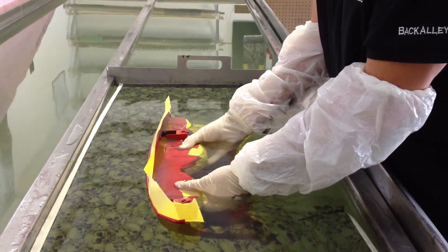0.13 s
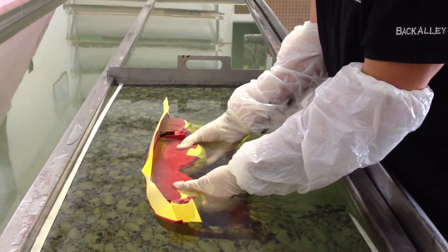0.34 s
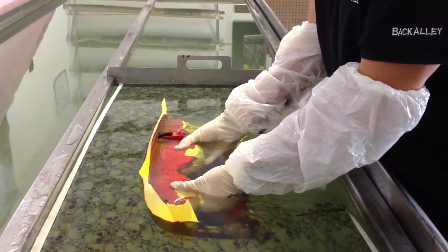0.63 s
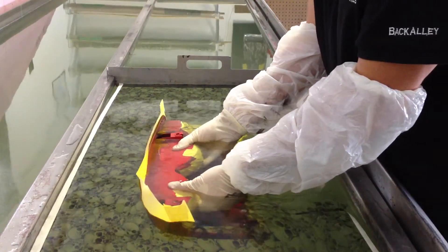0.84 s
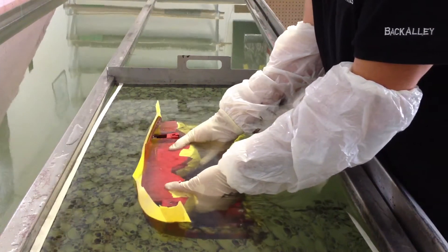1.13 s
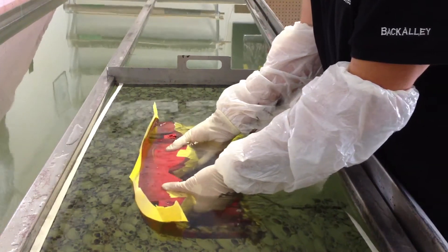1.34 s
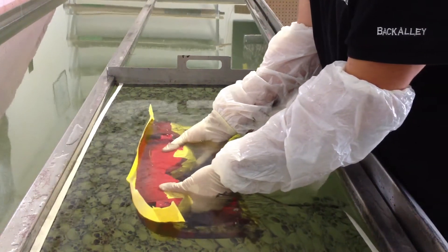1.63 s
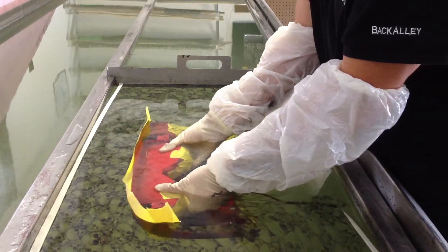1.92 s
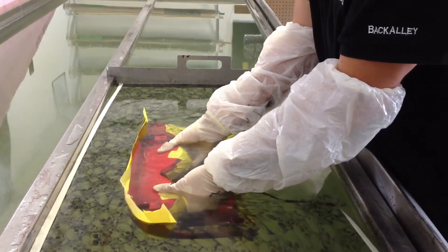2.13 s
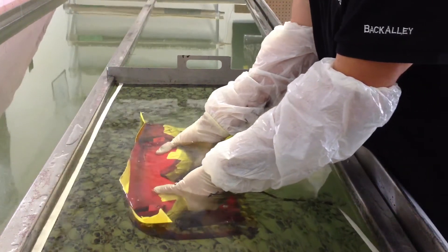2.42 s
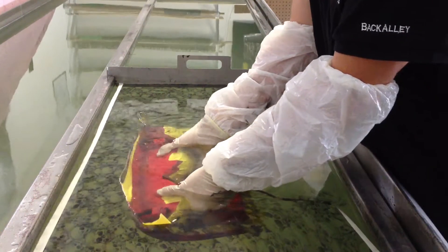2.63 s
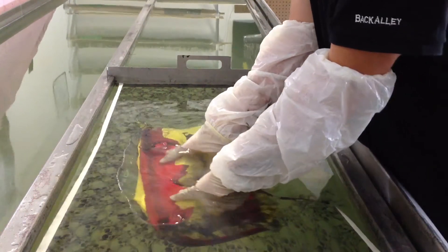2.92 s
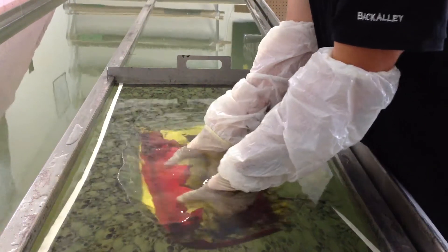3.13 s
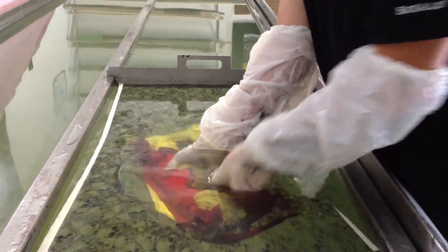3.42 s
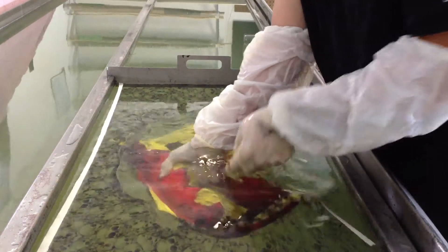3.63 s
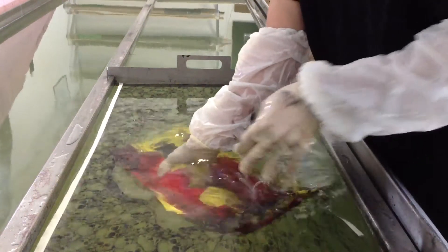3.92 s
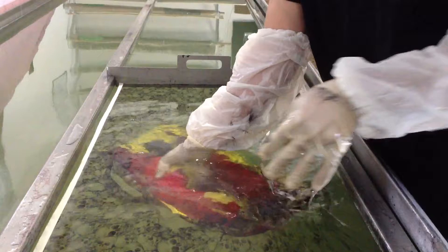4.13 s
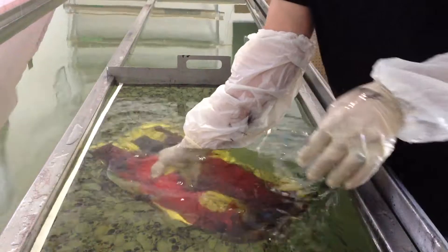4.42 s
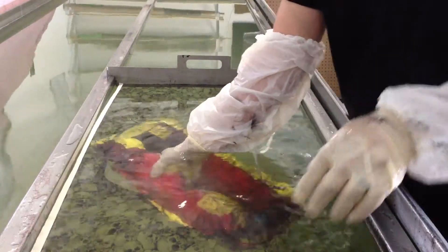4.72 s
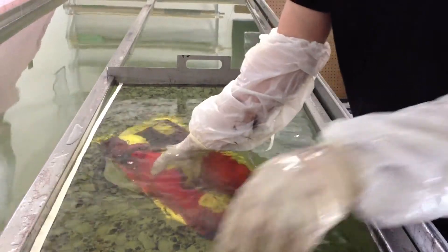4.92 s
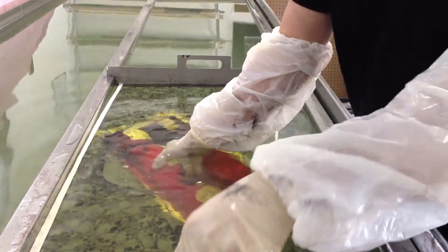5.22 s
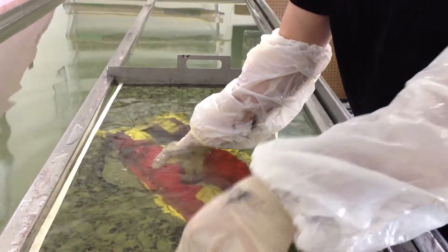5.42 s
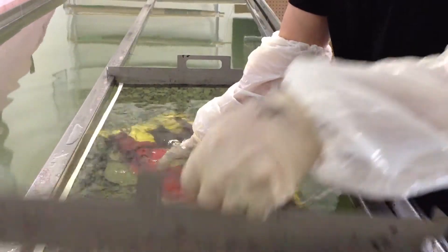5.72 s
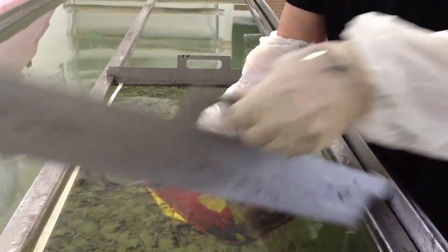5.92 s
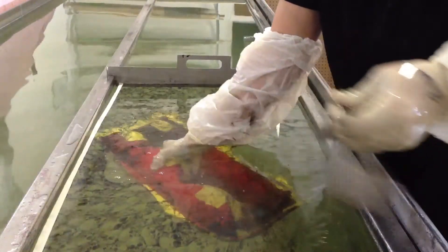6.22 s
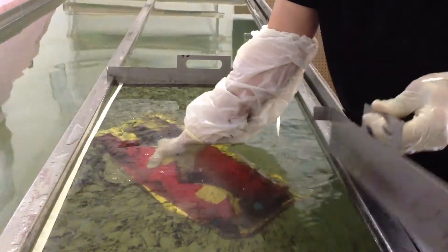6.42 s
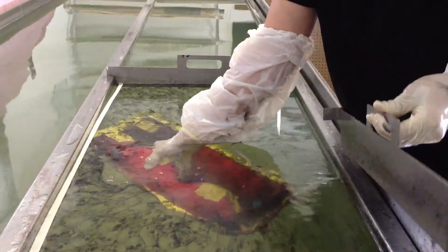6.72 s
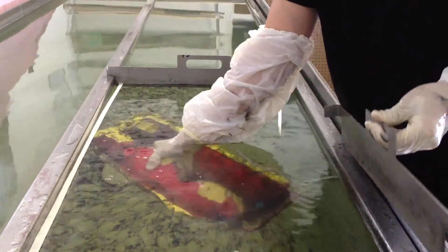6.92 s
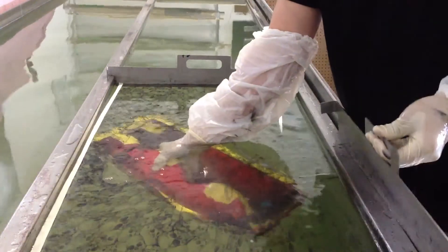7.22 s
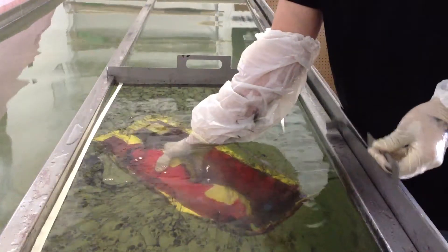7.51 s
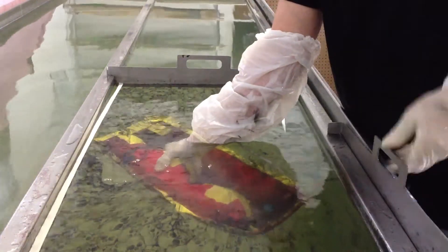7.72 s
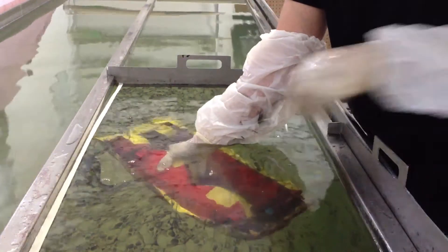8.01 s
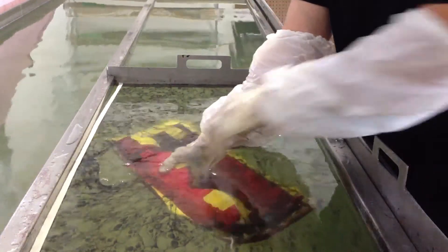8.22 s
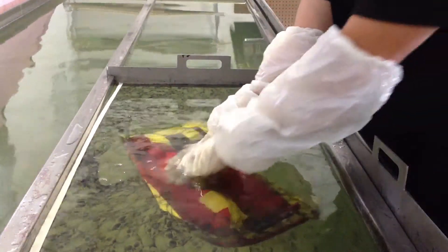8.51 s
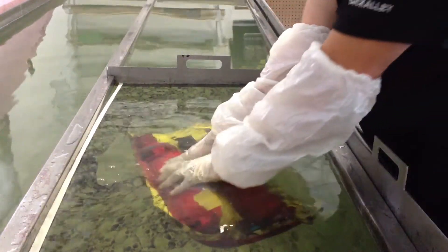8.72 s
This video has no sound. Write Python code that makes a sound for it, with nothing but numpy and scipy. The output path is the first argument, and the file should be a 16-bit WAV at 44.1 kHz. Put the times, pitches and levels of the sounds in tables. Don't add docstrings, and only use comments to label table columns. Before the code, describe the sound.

Quiet shed hum with cricket and bird, then wet plastic sleeves crackle, drops plink, and a steel bar clangs and scrapes on a tank rim.

```python
import sys
import numpy as np
from scipy import signal
from scipy.fft import rfft, irfft
from scipy.io import wavfile
from scipy.ndimage import map_coordinates

SR = 44100
rng = np.random.default_rng(int(sys.argv[2]) if len(sys.argv) > 2 else 0)


def gain_from_db(level_db):
    decades = np.asarray(level_db, float) / 20
    return 10 ** decades


def log_audio(samples):
    frames = np.atleast_2d(samples).T
    limited = np.clip(frames, -1, 1)
    pcm = np.round(limited * 32767).astype(np.int16)
    wavfile.write(sys.argv[1], SR, pcm)


N = 390726


def rms_one(x):
    return x / np.sqrt(np.mean(x ** 2) + 1e-20)


def energy_one(x):
    return x / np.sqrt(np.sum(x ** 2))


def seconds(length_s):
    return np.arange(round(length_s * SR)) / SR


def bin_hz(length):
    return np.maximum(np.fft.rfftfreq(length, 1 / SR), 10)


def high_pass(order, hz):
    return signal.butter(order, hz, "high", fs=SR, output="sos")


def in_time(rows, outside=None):
    s, *columns = np.transpose(rows)
    return [np.interp(np.arange(N) / SR, s, c, outside, outside) for c in columns]


def at_hz(points, hz):
    table = np.array(points)
    return np.interp(np.log(hz), np.log(table[:, 0]), table[:, 1])


def drift(rate):
    r = np.exp(-80 * np.pi * rate / SR)
    white = rng.standard_normal(N // 40 + 2002)
    slow = rms_one(signal.lfilter([1], [1, -2 * r, r * r], white)[2000:])
    return np.interp(np.arange(N) / 40, np.arange(len(slow)), slow)


def colour(x, spectrum):
    return rms_one(irfft(rfft(x) * gain_from_db(at_hz(spectrum, bin_hz(len(x)))), len(x)))


def add(out, s, sound):
    i = round(s * SR)
    out[i:i + len(sound)] += sound[:N - i]


def grains(per_s, spread_db):
    sizes = gain_from_db(spread_db * np.minimum(rng.exponential(1, N), 5)) * rng.choice([-1, 1], N)
    return rms_one(sizes * (rng.random(N) < per_s / SR))


def modes(table, length_s):
    t, out = seconds(length_s), 0
    for hz, db, t60 in table:
        out = out + gain_from_db(db - 60 * t / t60) * np.sin(2 * np.pi * hz * t) * rng.choice([-1, 1])
    return energy_one(out)


def dying_noise(spectrum, t60_at, rise_cycles, late_db, length_s):
    t, out = seconds(length_s), 0
    edges = 45 * 2 ** np.arange(1, 8.9, 1 / 3)
    white = rng.standard_normal((2, len(t)))
    for k, (low, high) in enumerate(zip(edges, edges[1:])):
        hz = np.sqrt(low * high)
        t60 = at_hz(t60_at, hz)
        fall_db = -60 * t / t60
        rise = 1 - np.exp(-t * hz / rise_cycles)
        shape = rise * (gain_from_db(fall_db) + gain_from_db(late_db + 0.41 * fall_db)) / np.sqrt(t60)
        third = signal.butter(2, [low, high], "band", fs=SR, output="sos")
        out = out + gain_from_db(at_hz(spectrum, hz)) * shape * signal.sosfilt(third, white[k % 2])
    return energy_one(out)


def excite(force, response, first_s):
    i = round(first_s * SR)
    return np.r_[np.zeros(i), signal.fftconvolve(force[i:], response)[:N - i]]


def shed_air():
    # f/Hz, density level/dB
    spectrum = [(24, -68), (40, -38.5), (91, -14.5), (132, -7.5), (218, -6.5), (333, -8), (417, -5.5),
                (562, -10.5), (1160, -13), (1640, -17.5), (6160, -19), (8110, -11.5), (9410, -26.5),
                (14400, -19), (15500, -18.5)]
    # t/s, level/dB
    swell = [(0, -1), (1, 0), (2, 0.5), (3, 0), (4, 1), (5, 3.5), (6.5, 2), (8.86, 0)]
    level_db = -65.5 + in_time(swell)[0] + .6 * drift(3.0)
    return gain_from_db(level_db) * colour(rng.standard_normal(N), spectrum)


def motor():
    # t/s, rate/(turns per s)
    speed = [(0, 24.0), (.33, 23.9), (.86, 24.1), (1.25, 24.5), (1.94, 24.8), (2.23, 24.8), (2.5, 24.45),
             (2.88, 24.2), (3.21, 24.3), (3.69, 24.1), (4.57, 24.3), (5.25, 24.6), (6.2, 24.6), (6.7, 24.3),
             (8.86, 24.4)]
    # t/s, level/dB, even orders over odd/dB
    strength = [(0, -78, -1), (.9, -76.5, -7), (1.25, -73, 4), (2.5, -73.5, 11), (2.7, -78.5, -3),
                (3.2, -75.5, -7.5), (3.7, -75.5, 2.5), (4.3, -77, -3.5), (4.8, -76, -3),
                (5.25, -77.5, -11.5), (6.2, -72.5, -8), (6.7, -76, -1), (8.86, -69.5, 3)]
    # multiple of shaft rate/1, level/dB
    orders = [(1, -43), (2, -37.5), (3, -36), (4, -15), (5, -15.5), (6, -3.5), (7, -1.5), (8, 0.5), (9, 0),
              (10, -5.5), (11, -10.5), (12, -10), (13, -8.5), (14, -14), (15, -12.5), (16, -20), (17, -9.5),
              (18, -21.5)]
    (turns,), (db_all, even_db) = in_time(speed), in_time(strength)
    phase, out = 2 * np.pi * np.cumsum(turns) / SR, 0
    for k, db in orders:
        level_db = db + db_all + even_db / 2 * (-1) ** k + 1.3 * drift(1.0)
        out = out + np.sqrt(2) * gain_from_db(level_db) * np.sin(k * phase + rng.uniform(0, 2.5))
    return out


def cricket():
    # first pulse t/s, last pulse t/s, level/dB
    bouts = [
        (.064, 1.816, -64),
        (1.877, 2.21, -72),
        (2.265, 3.289, -64),
        (3.349, 5.43, -65),
        (5.49, 6.2, -67),
        (6.26, 8.85, -72),
    ]
    # f/Hz, level/dB, delay/s, pulse length/s
    wings = [(8380, 0.5, .0, 0.012), (8160, -2.5, .004, 0.02)]
    period_s, out = .0603, np.zeros(N)
    for first, last, db in bouts:
        for s in np.linspace(first, last, round((last - first) / period_s) + 1):
            for hz, wing_db, delay, length in wings:
                hz_chance, time_chance, db_chance = rng.standard_normal(3)
                t = seconds(length)
                burst = np.hanning(len(t)) * np.sin(2 * np.pi * (hz + 25 * hz_chance) * t)
                start = max(s + delay - .003 + 0.0019 * time_chance, 0)
                add(out, start, gain_from_db(db + wing_db + 1.6 * db_chance) * burst)
    return out


def bird():
    # t after start/s, f/Hz, level/dB, blur/Hz
    call = [
        (0, 4520, 1, 598),
        (.06, 4520, 7, 664.5),
        (0.109, 4320, 6.5, 599),
        (.17, 3850, 3, 455),
        (0.212, 3556, 9, 408),
        (.25, 3650, 8, 200),
        (.33, 3664, 2, 182),
        (.5, 3650, -10, 180),
    ]
    # t/s, level/dB
    calls = [
        (.71, -78),
        (2.84, -75.5),
        (4.51, -73.5),
        (6.52, -73),
        (8.45, -75),
    ]
    # t/s, length/s, f/Hz, level/dB
    peeps = [
        (.04, .12, 4900, -74),
        (.33, .15, 5600, -80),
        (1.64, .16, 4850, -76),
        (1.95, .15, 5500, -82),
        (2.5, .15, 4800, -79),
    ]
    out = np.zeros(N)
    notes = [(s, db, call) for s, db in calls]
    for s, length, hz, db in peeps:
        notes.append((s, db, [(0, hz, -9, 250), (.03, hz, 0, 250), (length, hz, -12, 250)]))
    for s, db, shape in notes:
        at, hz, level_db, blur_hz = np.transpose(shape)
        t = seconds(at[-1])
        turns = np.cumsum(np.interp(t, at, blur_hz)) * 2 / SR
        blur = map_coordinates(rng.standard_normal(1000), [turns], order=3)
        phase = 2 * np.pi * np.cumsum(np.interp(t, at, hz)) / SR
        add(out, s, gain_from_db(db + np.interp(t, at, level_db)) * blur * np.sin(phase))
    return out


def shed_echo(near, far):
    shed = dying_noise([(100, 2.0), (15000, -9.0)], [(200, .8), (10000, 0.44)],
                       rise_cycles=20.0, late_db=-45.0, length_s=0.62)
    return signal.oaconvolve(gain_from_db(-11) * near + gain_from_db(-3) * far, shed)[:N]


def movement():
    # start t/s, peak t/s, end t/s, peak level/dB, brightness/dB
    moves = [(2.39, 2.407, 2.66, -70, 2), (2.697, 3.1, 3.54, -67, 2), (3.283, 3.34, 3.67, -62, 2),
             (3.394, 3.433, 3.48, -57, -3), (3.603, 3.7, 4.13, -57.5, -2.5), (3.9, 4.036, 3.7, -62.5, 3),
             (4.14, 4.22, 4.6, -64, -2), (4.567, 4.59, 4.77, -55, 0.5), (4.792, 4.968, 5.1, -58, -2),
             (5.172, 5.25, 5.4, -64, -10), (5.33, 5.35, 5.43, -62, -7), (5.544, 5.614, 5.7, -58, 2),
             (5.728, 5.79, 6.04, -54, -2), (6.02, 6.038, 6.4, -60, -4), (6.3, 6.396, 7, -67.5, -4),
             (7.748, 7.9, 8.04, -53.5, -2), (8.003, 8.04, 6.5, -64, -3), (8.117, 8.12, 7.9, -57, 2),
             (8.154, 8.165, 8.2, -63, 6), (8.203, 8.326, 8.55, -54, -0.5), (8.363, 8.4, 8.58, -59.5, 0.5),
             (8.491, 8.51, 8.77, -59.5, -2)]
    rise_db, fall_db, edge_s, tail_s = 5.5, 9, 0.011, 0.083
    t, power = np.arange(0, N + 64, 64) / SR, 0
    for start, peak, end, db, bright_db in moves:
        peak, end = max(peak, start), max(end, peak, start)
        at = [start - edge_s, start, peak, end, end + tail_s]
        shape_db = np.interp(t, at, [-40, -rise_db, 0, -fall_db, -30], -120, -120)
        power = power + gain_from_db(2 * (db + shape_db)) * gain_from_db([[0], [2 * bright_db]])
    return np.array([np.interp(np.arange(N) / SR, t, gain) for gain in np.sqrt(power)])


def rustle(moving):
    # f/Hz, density level/dB
    spectrum = [(530, -14), (900, -10.5), (1380, -7.5), (1560, -4.5), (1820, -7.5), (2360, -7.5),
                (7320, -0.5), (13800, -8.5), (15500, -8)]
    creases = grains(2500 * gain_from_db(4.0 * drift(30.0)), spread_db=2.0)
    body = colour(creases + .5 * rng.standard_normal(N), spectrum)
    bright = signal.sosfiltfilt(high_pass(4, 8700), body)
    return moving[0] * (body - bright) + gain_from_db(-6.0) * moving[1] * rms_one(bright)


def squeak():
    # t/s, f/Hz, level/dB
    track = [
        (2.7, 13100, -86),
        (2.77, 14200, -76),
        (2.86, 13000, -80),
        (2.94, 14300, -82),
        (3.04, 12800, -80),
        (3.2, 14000, -79),
        (3.26, 12300, -75),
        (3.34, 11600, -90),
    ]
    hz, db = in_time(track)
    t = np.arange(N) / SR
    phase = 2 * np.pi * np.cumsum(hz * (1 + .008 * drift(30.0))) / SR
    on = (t > track[0][0]) & (t < track[-1][0])
    main = drift(60.0) * np.sin(phase)
    companion = gain_from_db(-6 + 7.0 * drift(6.0)) * drift(60.0) * np.sin(phase)
    return on * gain_from_db(db + 1) * (main + companion)


def drops(moving):
    # t/s, peak level/dB, f/Hz
    glove_drops = [(2.742, -49, 7280), (2.809, -42, 7600), (3.0423, -52, 3650), (3.3396, -48, 7920),
                   (3.5436, -44, 5460), (3.611, -44, 5650), (3.6589, -44, 7510), (3.7736, -45, 7760),
                   (3.8983, -44, 6700), (3.992, -45, 3970), (4.0253, -42.5, 7100), (4.1378, -52, 5700),
                   (4.1944, -45, 5700), (4.23, -40, 6600), (4.3015, -45, 7220), (4.364, -46, 7600),
                   (4.4979, -48, 4900), (4.5703, -45, 7010), (4.6496, -43, 7170), (4.7785, -45, 3700),
                   (4.8608, -48, 6290), (4.9843, -43, 7470), (5.1074, -54, 6050), (5.1744, -46, 7400),
                   (5.2433, -47, 6270), (5.2971, -49, 4800), (5.337, -43.5, 6050), (5.418, -40.5, 7700)]
    # t/s, peak level/dB, f/Hz
    sleeve_creases = [(5.7394, -40, 6600), (5.7962, -45, 5800), (6.029, -38, 7520), (6.117, -49, 3320),
                      (6.1384, -64, 7750), (6.2158, -51, 7310), (6.359, -55, 7958), (6.4594, -46, 7120),
                      (8.117, -39, 7240), (8.2232, -50, 2800), (8.3094, -48.5, 7500), (8.5193, -45.5, 7950),
                      (8.668, -54, 3824)]
    # t/s, peak level/dB, f/Hz, ring/cycles, tick over ring/dB
    drips = [(1.488, -52, 11000, 12, 4), (1.494, -56, 8000, 10, 2), (1.615, -54, 11800, 60, -8),
             (1.63, -56, 13400, 60, -8), (1.497, -56, 5800, 20, -20), (1.596, -47, 12300, 40, -10),
             (1.605, -55, 12900, 200, -12), (2.7, -60, 1800, 12, -20), (3.562, -53, 2540, 12, -14),
             (3.572, -58, 3200, 14, -15), (3.592, -58, 3710, 10, -12), (3.612, -55, 4400, 14, -12),
             (3.685, -58, 2300, 20, -15), (3.619, -56, 1540, 35, -25), (3.64, -49, 4200, 20, -20),
             (3.655, -49, 3300, 22, -20), (3.708, -50, 3850, 20, -20), (3.724, -52, 2400, 7, -8),
             (3.765, -55, 2050, 12, -15), (3.772, -55, 2600, 12, -15), (3.926, -56, 2420, 10, -12),
             (4.17, -58, 3740, 10, -12), (4.27, -56, 1210, 8, -20), (3.43, -58, 750, 10, -20),
             (3.445, -58, 2800, 10, -12), (3.88, -57, 2000, 6, -15), (3.9, -53, 6500, 5, -2),
             (4.097, -50, 2200, 9, -8), (4.6, -58, 1750, 12, -20)]
    rows = [(s, db - 2, hz, 12, -3.5) for s, db, hz in glove_drops] + drips
    rows += [(s, db - 2.5, hz, 15, -4.5) for s, db, hz in sleeve_creases]
    spray_per_s, spray_db = 28, 6.5
    for when, size, pitch, falls in rng.random((400, 4)):
        gain = moving[0, int(when * N)]
        if falls < spray_per_s * N / SR / 400 and gain > 1e-4:
            db = 20 * np.log10(gain) + spray_db - 8 * size
            rows.append((when * N / SR, db, 1700 * 4.2 ** pitch, 15, -12))
    out, t = np.zeros(N), seconds(.045)
    tick_band = signal.butter(1, [3500, 11000], "band", fs=SR, output="sos")
    ticks = signal.sosfilt(tick_band, rng.standard_normal((500, len(t)))) * np.exp(-t / 0.0023)
    swell = 1 - np.exp(-t / .0002)
    for (s, db, hz, cycles, tick_db), tick in zip(rows, ticks):
        ring = np.sin(2 * np.pi * hz * t * (1 + 1.16 * t)) * gain_from_db(-60 * t * hz / cycles / 3) * swell
        add(out, s, gain_from_db(db) * (ring + gain_from_db(tick_db) * tick))
    return out


def lifted_bar():
    # t/s, level/dB
    lift = [
        (5.449, -25),
        (5.46, -37.5),
        (5.49, -38),
        (5.54, -39),
        (5.6, -68),
    ]
    # f/Hz, density level/dB
    spectrum = [(59, -57), (100, -21), (205, -10), (258, -9.5), (403, -4.5), (589, -12.5), (682, -0.5),
                (861, -1.5), (1130, -12.5), (1880, -13.5), (2220, -20.5), (6950, -25.5), (15500, -50)]
    # f/Hz, T60/s
    decay = [(200, 2.26), (800, 0.82), (2200, 0.59), (8000, 0.39)]
    # f/Hz, level/dB, T60/s
    single = [(317, -8, 1.9), (418, -2, 0.7), (560, -9, 1.4), (598, -22, 4.8), (668, 0, 1.4),
              (807, -7, 0.98), (856, -6, 0.84), (947, -7, 0.57), (1040, -7, 1.2), (1240, -4, 1.2),
              (1340, -17, 0.91), (1604, -20, 0.96), (1900, -15, 1.2), (1980, -5, 0.56)]
    body = dying_noise(spectrum, decay, rise_cycles=.6, late_db=-15, length_s=1.5)
    body = body + gain_from_db(-7) * modes(single, 1.5)
    scrape = gain_from_db(in_time(lift, outside=-150)[0]) * rng.standard_normal(N)
    add(scrape, lift[0][0], gain_from_db([-13.0]))
    return excite(scrape, body, lift[0][0])


def panels():
    # t/s, f/Hz, peak level/dB, T60/s
    rings = [(4.561, 303, -46.5, 0.05), (4.585, 241, -51, .08), (4.575, 1230, -62, 0.094),
             (6.935, 565, -34.5, 1.5), (6.935, 195.5, -40, 0.53), (5.448, 940, -36, 0.043),
             (5.455, 336, -51, 0.54), (5.461, 419.5, -45.5, .4), (5.46, 1930, -43, 0.35),
             (5.48, 196, -52, 0.47), (6.935, 161, -46, 1.3), (6.935, 103.4, -57, .8),
             (7.212, 168, -44, 0.71), (7.57, 100, -62.5, 2.6), (7.569, 221.7, -44, 2.7),
             (7.569, 483.5, -46.5, 1.8), (6.935, 705, -32, 0.37), (6.935, 647, -33.5, 0.7),
             (6.935, 861, -39, 0.72), (6.935, 366, -46, 0.74), (6.935, 291.5, -42.5, 0.73),
             (6.935, 2030, -46, 0.44), (7.156, 350, -31, 0.62), (7.212, 711, -28, 0.69),
             (7.212, 796, -30.5, 0.73), (7.212, 1280, -37, 0.95), (7.412, 194.4, -33.5, 1),
             (7.411, 346.8, -18.5, 0.13), (7.411, 565, -31, 0.52), (7.411, 625.5, -27.5, 0.78),
             (7.41, 2580, -24.5, 0.25), (7.48, 349, -18, 0.3), (7.53, 617, -25, 0.31),
             (7.41, 5700, -29, 0.28), (7.41, 7400, -32, .35), (7.412, 8020, -34, .4),
             (7.425, 11996, -36, .5), (7.412, 3860, -30, 0.21), (7.155, 5660, -30, 0.14),
             (7.156, 3280, -39, 0.09), (7.528, 5800, -27, 0.13), (7.569, 6870, -28, 0.14),
             (7.76, 560, -31.5, 0.46)]
    out, beat_hz = np.zeros(N), 14
    for (s, hz, db, t60), (apart, turn) in zip(rings, rng.uniform(-1.007, 1, (len(rings), 2))):
        t60 = min(t60, max(850 / hz, .3))
        t = seconds(min(t60, 2))
        twin_hz = hz + beat_hz * (apart + np.sign(apart)) / 2
        twin = gain_from_db(-7) * np.sin(2 * np.pi * (twin_hz * t + turn))
        envelope = gain_from_db(db - 60 * t / t60) * (1 - np.exp(-t * hz / .8))
        add(out, s, envelope * (np.sin(2 * np.pi * hz * t) + twin))
    return out


def tank():
    # t/s, strength level/dB, flat landing/dB, hardness/dB, crack level/dB
    blows = [
        (6.934, -34, 3.5, -11.5, -22.5),
        (7.048, -60.5, 23, 6.5, -36),
        (7.154, -33, -7.5, -1, -32),
        (7.2126, -31, 4.5, -1.5, -13),
        (7.409, -29.5, -6.5, 1, -38),
        (7.4134, -25, -8, 1.5, -14.5),
        (7.5, -31.5, -10, -6.5, -29),
        (7.5681, -32, -6.5, 7.5, -2.5),
        (7.998, -58, -19, -35, -55),
    ]
    # t/s, pressure level/dB, hardness/dB, edge/dB
    pushes = [
        (7.153, -50.5, 20, 9),
        (7.165, -46.5, -3, 2),
        (7.2, -44, 2, -6.5),
        (7.24, -37, 2.5, -2),
        (7.29, -38, -7, -17),
        (7.33, -40.5, -14, -7),
        (7.355, -55.5, -2, -1),
              (7.361, -58, 19, -3),
        (7.378, -40.5, 10.5, -10.5),
        (7.405, -46, -5, -7),
        (7.45, -31, 5.5, -9.5),
        (7.501, -36, 9, -8),
        (7.518, -38.5, 3.5, -3.5),
        (7.535, -32, 5.5, -9),
        (7.585, -35, 2, 3),
        (7.66, -65, -4, -6),
    ]
    # f/Hz, density level/dB
    spectrum = [(35, -78), (60, -45), (187, -10.5), (253, -13.5), (343, 2), (413, -6), (599, -2.5),
                (657, -8.5), (1420, -14), (2650, -12.5), (5080, -14), (5980, -9.5), (15500, -39.5)]
    # f/Hz, T60/s
    decay = [(120, 0.86), (320, 2.2), (840, 1.29), (2200, 0.58), (5800, 0.41), (12000, 0.35)]
    # f/Hz, level/dB, T60/s
    single = [(221.47, -14, 3.57), (528, -15, 2.4), (340, -4, 0.71), (471.4, -14, 1.6), (565, -3.5, 1.25),
              (619, -5.5, 1.0), (845, -8, 1.16), (1039, -12, 1.0), (5720, 1, 0.24)]
    t = seconds(2.5)
    body = dying_noise(spectrum, decay, rise_cycles=2.1, late_db=-24.5, length_s=2.5)
    body = body + gain_from_db(-10.0) * modes(single, 2.5)

    slips = grains(600 * gain_from_db(3.3 * drift(25.0)), spread_db=1.0)
    press_db, hard_db, edge_db = in_time(pushes, outside=-150)
    ring_db = press_db + hard_db
    force = gain_from_db([press_db, press_db - 2.5, press_db + 0.3, ring_db, ring_db + edge_db]) * slips

    out, short = np.zeros(N), t[:1500]
    crack_hz, crack_s = 6130, 0.0003
    crack = np.sin(2 * np.pi * crack_hz * short) * (short / crack_s) * np.exp(1 - short / crack_s)
    for s, boom_db, flat_db, hard_db, crack_db in blows:
        clang_db = -5 + 0.51 * hard_db
        range_db = boom_db + np.array([0, flat_db, clang_db, hard_db, hard_db - 9])
        contact = gain_from_db(-36.0) * rng.standard_normal(len(short)) * np.exp(-short / 0.0083)
        contact[0] = 1
        for part, db in zip(force, range_db):
            add(part, s, gain_from_db(db + 33.5) * contact)
        for lag, echo_db in [(0, 0), (.0045, -9), (.0105, -6), (.017, -7)]:
            add(out, s + lag, gain_from_db(crack_db + echo_db) * crack)

    centres_hz = [330, 800, 1900, 6000, 13000]
    for part, share in zip(force, np.eye(5)):
        weight = at_hz(list(zip(centres_hz, share)), bin_hz(len(t)))
        response = irfft(rfft(body) * weight, len(t))[:-4000]
        out += excite(part, energy_one(response), blows[0][0])
    return signal.sosfilt(high_pass(2, 110), out)


def scene():
    moving = movement()
    near, far = drops(moving) + cricket(), bird()
    wet = shed_echo(near, far)
    background = shed_air() + motor()
    steel = tank() + panels() + lifted_bar()
    return (background + rustle(moving) + near + far + wet + steel + squeak())[None]


def low_pass(x):
    return signal.sosfilt(signal.butter(12, 15580, fs=SR, output="sos"), x)


def record(dry):
    x = signal.sosfilt(high_pass(2, 70), dry)
    x = irfft(rfft(x) * (np.fft.rfftfreq(N, 1 / SR) < 15400), N)
    return low_pass(x)


dry = scene()
out = record(dry)
log_audio(out)
```